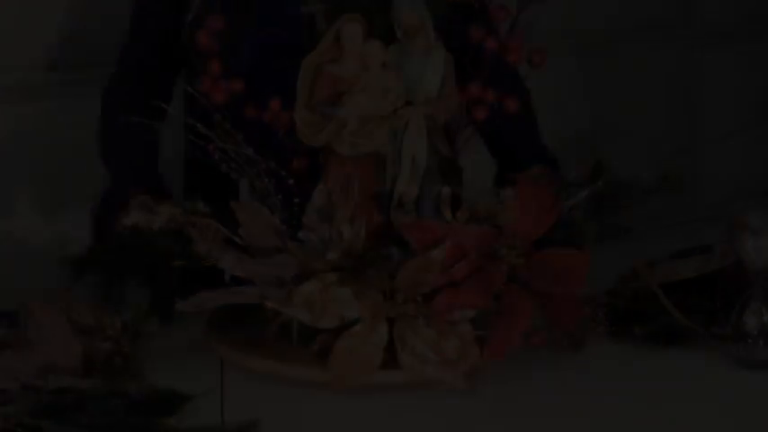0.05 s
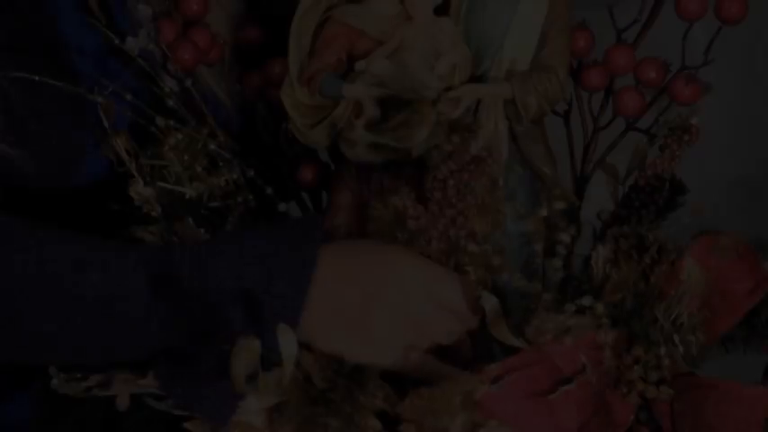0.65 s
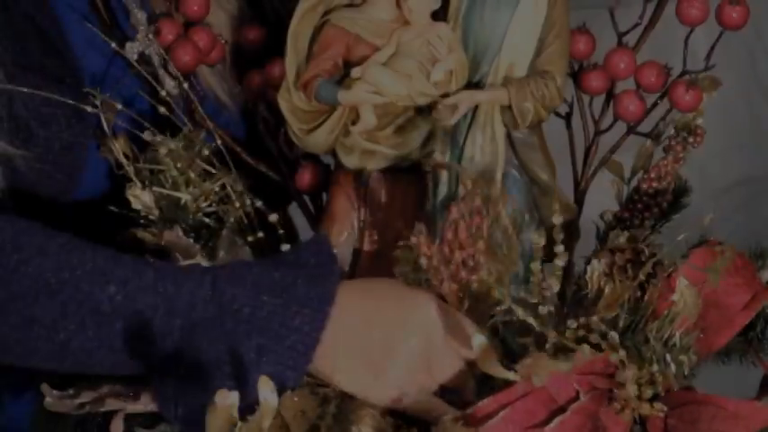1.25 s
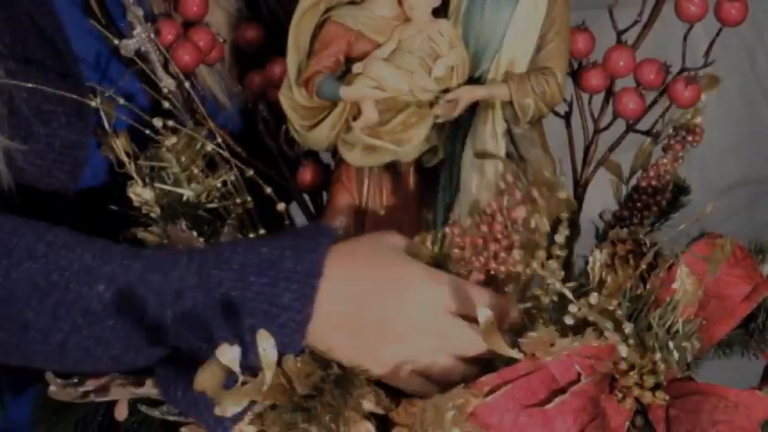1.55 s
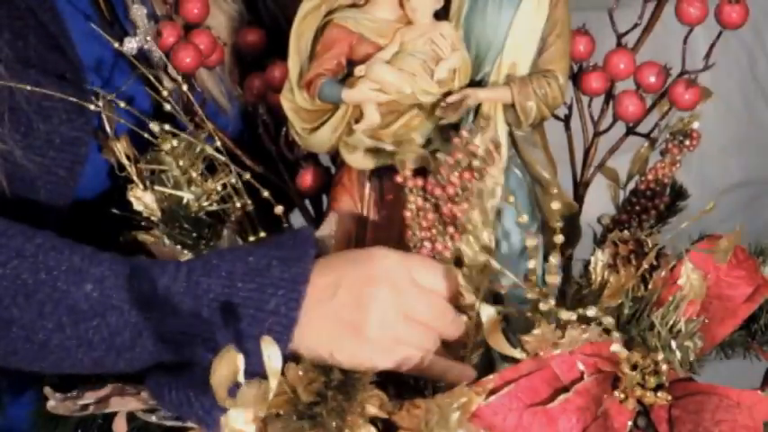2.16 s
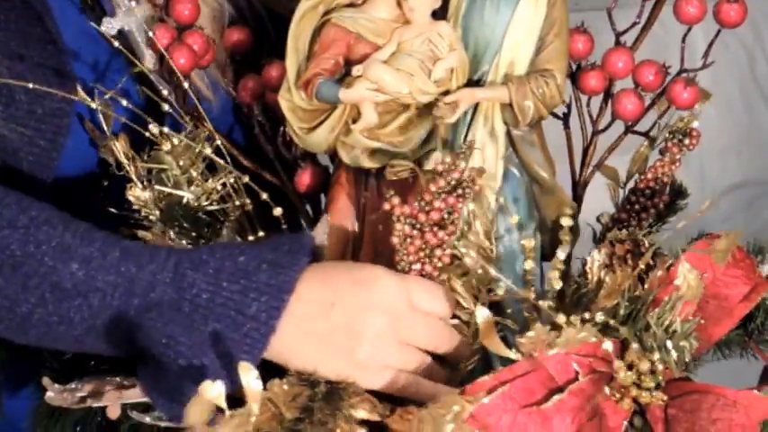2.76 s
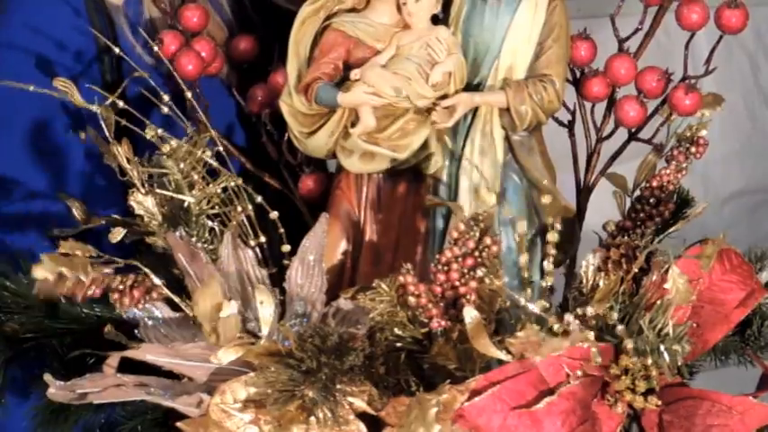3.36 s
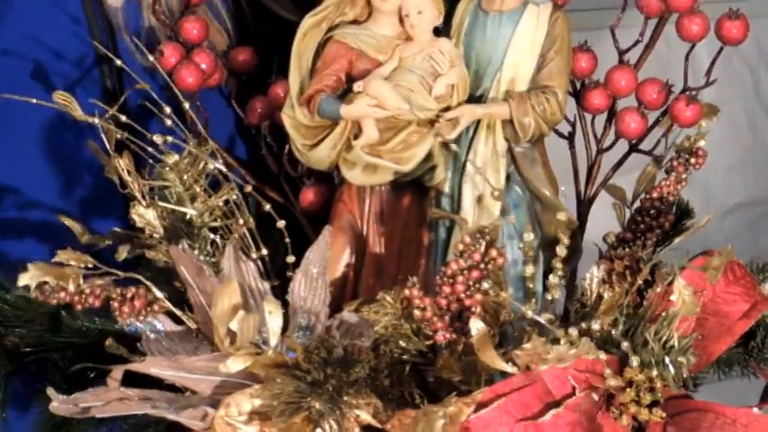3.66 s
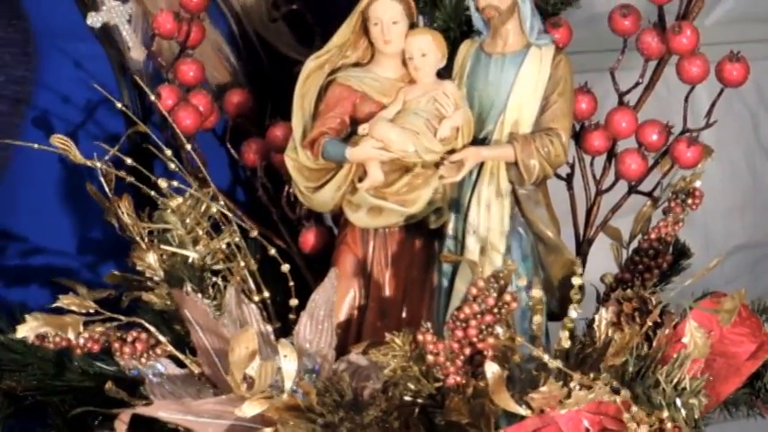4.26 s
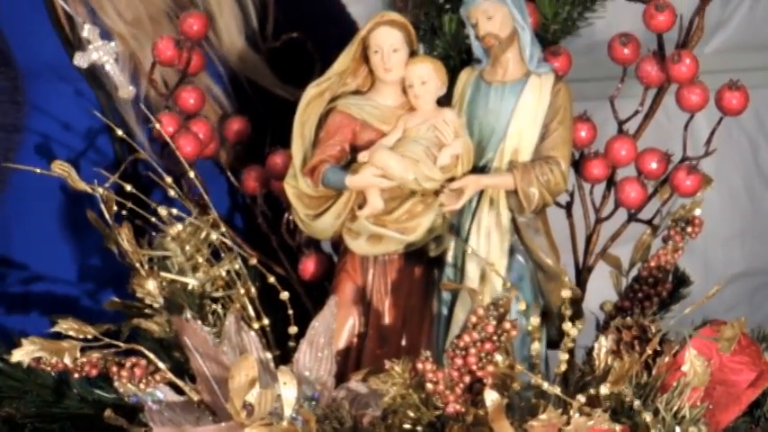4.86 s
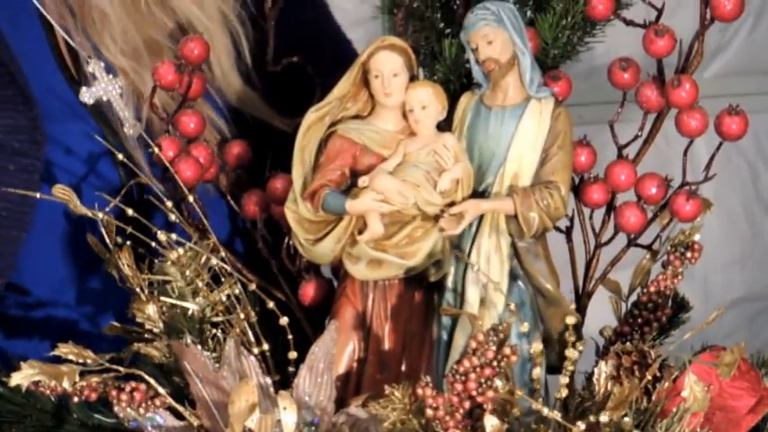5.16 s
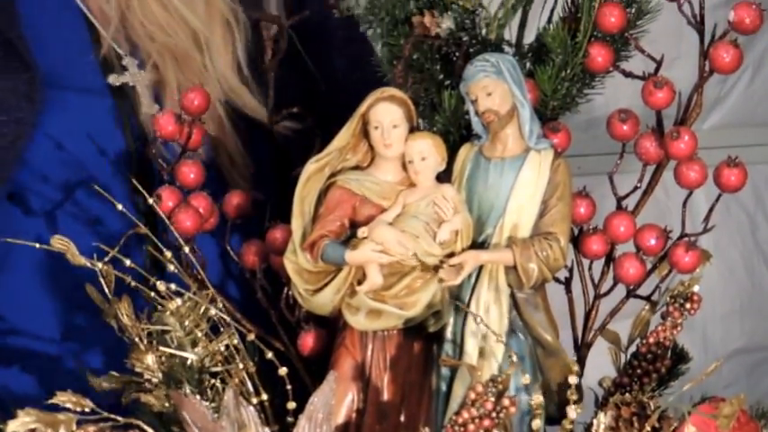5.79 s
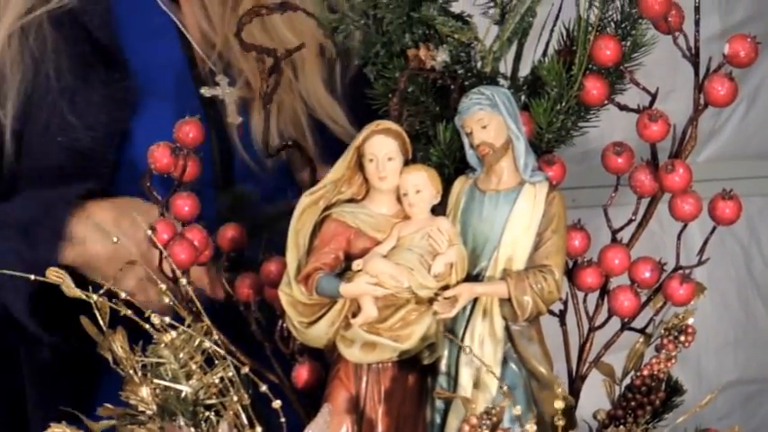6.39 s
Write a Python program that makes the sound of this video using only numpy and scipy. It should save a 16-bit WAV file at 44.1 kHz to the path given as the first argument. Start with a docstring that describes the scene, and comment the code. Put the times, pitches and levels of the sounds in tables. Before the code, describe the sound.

In a small, quiet room, a faint rustle fades out and the sound gradually returns. A plastic sprig is shoved into a foam block several times, crunching while stiff artificial leaves snap and click close to the microphone. The greenery then rustles in short, crisp strokes, and things drag and bump softly on the table, over a low rumble and hiss.

```python
"""A sprig of plastic berries and glittery stems is pushed into a floral arrangement in a small room.
Its stem crunches into the foam in a few shoves, each a swarm of tiny breaks. Stiff leaves brush past
each other and snap free, then things are dragged and bumped on the table behind it.
A near surface repeats every snap, and the room rings briefly over a low rumble and hiss.
The sound starts quiet, fades out, and is fully back after about two seconds."""
import sys
import numpy as np
from scipy import signal
from scipy.fft import rfft, irfft, next_fast_len
from scipy.io import wavfile
from scipy.ndimage import uniform_filter1d

SR = 44100
rng = np.random.default_rng(int(sys.argv[2]) if len(sys.argv) > 2 else 0)


def transcribe(signal):
    """Save signal, clipped to [-1, 1], as a 16-bit WAV file at the path in sys.argv[1]."""
    frames = np.atleast_2d(signal).T
    limited = np.clip(frames, -1, 1)
    pcm = np.round(limited * 32767).astype(np.int16)
    wavfile.write(sys.argv[1], SR, pcm)


N = 287973
T = np.arange(N) / SR
TOP_HZ = 14250  # higher pitches are cut from the finished sound


def undb(db):
    """Turn decibels into a number to multiply by."""
    return 10 ** (np.asarray(db) / 20)


def unit(x):
    """Scale a sound to an average power of 1."""
    return x / np.sqrt(np.mean(x ** 2))


def add(track, s, sound):
    """Mix a sound into the track, starting s seconds in."""
    i = max(int(s * SR), 0)
    track[i:i + len(sound)] += sound[:max(N - i, 0)]


def keep_band(x, kind, hz, order):
    """Keep the "low" or the "high" side of a pitch."""
    return signal.sosfilt(signal.butter(order, hz, kind, fs=SR, output="sos"), x)


def colour(x, points, modes=()):
    """Shape the tone with a curve of (pitch [Hz], relative level [dB]) points and any ringing notes."""
    size = 2 * next_fast_len(x.shape[-1])
    hz = np.arange(size // 2 + 1) * SR / size + 1e-3
    point_hz, point_db = np.transpose(points)
    curve = undb(np.interp(np.log(hz), np.log(point_hz), point_db))
    cepstrum = irfft(np.log(curve))
    response = np.exp(rfft(2 * cepstrum[:size // 2], size))  # rings after a hit, never before it
    response *= 1 + sum(undb(db) / (1 + 1j * (hz ** 2 - note ** 2) / (hz * width))
                        for note, width, db in modes)
    response /= np.sqrt(np.mean(np.abs(response[hz < TOP_HZ]) ** 2))
    return irfft(rfft(x, size) * response)[..., :x.shape[-1]]


def burst(hz, octaves, t60, size):
    """One small hit: a cluster of notes round one pitch that dies away by 60 dB in t60 seconds."""
    pitches = np.arange(1, size // 2 + 2) * SR / size
    weight = np.exp(-.5 * (np.log2(pitches / hz) / octaves) ** 2) / np.sqrt(pitches)
    ring = irfft(weight * np.exp(2j * np.pi * rng.random(len(pitches))))
    ring *= np.exp(-np.log(1000) * np.arange(size) / SR / t60)
    return ring / np.linalg.norm(ring)


def grains(per_s, spread_db, t60, octaves, count=24):
    """Many tiny breaks of uneven size, each ringing at one of a set of pitches."""
    chance = rng.random(N)
    sizes = undb(spread_db * np.minimum(rng.exponential(size=N), 3.5))
    hits = (chance < per_s / SR) * sizes * rng.choice([-1, 1], N)
    hits /= np.sqrt(uniform_filter1d(hits ** 2, SR // 25) + 1e-2)  # even out the loudness
    choice = rng.integers(count, size=N)
    return unit(sum(signal.oaconvolve(hits * (choice == k), burst(hz, octaves, t60, size=256))[:N]
                    for k, hz in enumerate(np.linspace(1800, 13500, count))))


def effort(moves, rise_s, fall_db_per_s):
    """Strength over time: each move swells up to its time, holds, then fades; the strongest leads."""
    strength = np.zeros(N)
    for s, held_s, db in moves:
        swell = np.clip(1 + (T - s) / rise_s, 0, 1)
        fall_db = fall_db_per_s * np.clip(T - s - held_s, 0, 1)
        strength = np.maximum(strength, swell * undb(db - fall_db))
    return strength


def scatter(delay_s, apart, size=512):
    """A path through the leaves: each pitch gets its own small delay; left and right part up high."""
    hz = np.arange(size // 2 + 1) * SR / size
    delay = delay_s * uniform_filter1d(rng.exponential(size=len(hz)), 2) + 8 / SR
    phase = np.cumsum(2 * np.pi * SR / size * delay)
    split = apart * hz / (hz + 1500) * 2 * uniform_filter1d(rng.standard_normal(len(hz)), size=4)
    return irfft(np.exp(-1j * (phase + np.array([split, -split]))))[:, :size // 2]


def room_response(tail_db, scatter_s, t60=0.51, echo_db=-3.5):
    """The room's answer to a click: direct sound, one near echo, and a tail whose highs die first."""
    t = T[:SR * 2 // 3]
    mid, side = rng.standard_normal((2, 2, len(t)))
    side = keep_band(side, "high", 700, order=1)
    pair = np.array([mid + side, mid - side])
    fall = -np.log(1000) * t / t60
    soft = keep_band(pair[:, 0], "low", 7000, order=2) * np.exp(fall)
    bright = keep_band(pair[:, 1], "high", 7000, order=2) * np.exp(1.43 * fall)
    tail = (soft + bright) * (1 - np.exp(-t / 0.00067))
    response = undb(tail_db) * tail / np.linalg.norm(tail, axis=1, keepdims=True)
    echo_s = .0053 + .00012 * rng.standard_normal()
    directs = scatter(scatter_s, apart=0.32)
    echoes = scatter(1.467 * scatter_s, apart=0.26)
    for channel, direct, echo in zip(response, directs, echoes):
        add(channel, 0, direct)
        add(channel, echo_s, undb(echo_db) * echo)
    return response / np.linalg.norm(response, axis=1, keepdims=True)


def room(x, tail_db, scatter_s, pan_db, wander_hz, count=4):
    """The paths to the two microphones change as the sounding spot wanders between a few places."""
    shares = np.maximum(np.cos(2 * np.pi * (wander_hz * T + np.arange(count)[:, None] / count)), 0)
    shares /= np.linalg.norm(shares, axis=0)
    heard = sum(signal.oaconvolve((x * share)[None], room_response(tail_db, scatter_s), axes=1)[:, :N]
                for share in shares)
    return heard * undb(np.array([[pan_db], [-pan_db]]) / 2)


# Tone of the quiet room: (pitch [Hz], relative level [dB])
BACKGROUND_TONE = [(11, -53), (18, 1), (55, -2), (96, -4), (130, -6.5), (326, -13), (396, -14.5),
                   (443, -14), (840, -16.5), (1020, -18.5), (2230, -23.5), (2710, -21.5), (3200, -24),
                   (5740, -25), (14000, -28.5)]


def background(whine_hz=2720, room_note_hz=204, level_db=-40):
    """The quiet room: a low rumble shared by both sides, a faint whine and a wide hiss."""
    notes = [(whine_hz, 130, -3.5), (room_note_hz, 14, -14.0)]
    mid = unit(colour(rng.standard_normal(N), BACKGROUND_TONE, notes))
    side = unit(colour(rng.standard_normal(N), BACKGROUND_TONE))
    side = undb(-11) * side + undb(-3) * keep_band(side, "high", 1500, order=1)
    return np.array([mid + side, mid - side]) * undb(level_db)


# Between shoves the hand stays on the sprig, stirring the leaves and grinding the stem a little.
GRIP_START_S, GRIP_HELD_S = 0.75, 1.9
# Tone of the rustle: (pitch [Hz], relative level [dB])
LEAF_TONE = [(710, -27), (1200, -10), (1290, -8), (2220, -9), (4380, -5.5), (6820, 0.5), (10100, -0.5),
             (11600, 1.5), (14000, 1.5)]
# Leaves and needles sweeping over each other: (time [s], hold [s], relative level [dB])
LEAF_STROKES = [(.01, 0.057, -29), (.13, 0.066, -39.5), (.60, 0.19, -42), (1.55, .28, -38),
                (2.06, 0.018, -39.5), (2.32, 0.19, -30.5), (2.58, 0.041, -44), (2.68, 0.14, -43.5),
                (2.835, 0.064, -36), (2.935, 0.092, -29), (3.03, 0.16, -28), (3.315, 0.0035, -36.5),
                (3.55, .004, -45), (4.035, 0.085, -42.5), (4.14, .12, -36.5), (4.355, .004, -47),
                (4.605, 0.049, -22), (4.69, 0.052, -30.5), (4.885, .004, -34), (4.96, .004, -34.5),
                (5.355, .03, -37), (5.415, 0.049, -32.5), (5.815, 0.081, -40), (6.3, .01, -52)]


def leaves(grip_db=-52):
    """Needles and glitter flick past each other in fine ticks; gives the sound and its strength."""
    moves = LEAF_STROKES + [(GRIP_START_S, GRIP_HELD_S, grip_db)]
    brush = effort(moves, rise_s=0.046, fall_db_per_s=233)
    ticks = grains(per_s=1500, spread_db=4, t60=0.0028, octaves=0.88) * brush
    rustle = colour(ticks, LEAF_TONE) * undb(1.12)
    return room(rustle, tail_db=5.0, scatter_s=0.000242, pan_db=0.3, wander_hz=17), brush


def small_snaps(handling, per_s=19, spread_db=2.5, count=400):
    """List lesser snaps that come by chance, about as strong as the handling is at that moment."""
    gaps = rng.gamma(2, .5, count) / per_s  # a leaf needs a moment to bend before it slips
    rows = []
    for s, (size, pitch) in zip(np.cumsum(gaps), rng.standard_normal((count, 2))):
        if s < T[-1]:
            handling_db = 20 * np.log10(handling[int(s * SR)] + 1e-9)
            rows.append((s, handling_db + .5 + spread_db * size, 8000 * 2 ** (.25 * pitch)))
    return rows


# Tone of stiff plastic: (pitch [Hz], relative level [dB])
PLASTIC_TONE = [(300, -60), (900, -13), (1500, -9), (2800, -3.5), (5000, -1.5), (8000, -0.5), (14000, 2)]
# The loudest snaps: (time [s], relative level [dB], pitch [Hz])
LOUD_SNAPS = [(0.0814, -20, 9900), (.734, -24, 9300), (.7953, -26, 9000), (.839, -11.5, 9100),
              (0.9027, -5, 7300), (.961, -14, 8550), (0.984, -4, 8200), (1.0148, -11, 7450),
              (1.0253, -10, 7600), (1.081, -9.5, 6600), (1.1752, -13, 6040), (1.2144, -20, 6500),
              (1.402, -19, 8550), (1.4116, -11.5, 8100), (1.4424, -9, 7060), (1.669, -17, 9800),
              (2.106, -20, 6800), (2.1198, -24, 6640), (2.137, -18, 6350), (2.1438, -18, 8000),
              (2.1833, -12, 6750), (2.1989, -9, 6000), (2.2248, -14, 7650), (2.2417, -19, 6800),
              (2.3361, -17, 8560), (2.6418, -15.5, 4800), (2.824, -27.5, 8500), (3.14, -21.5, 9050),
              (3.1894, -15.5, 12500), (4.013, -35.5, 6140), (4.628, -21, 10700), (4.8662, -20.5, 11500),
              (4.957, -28, 9500)]


def snaps(handling):
    """A stiff leaf or twig slips free with a sharp crack and a tiny ring; thin ones ring higher."""
    track = np.zeros(N)
    for s, db, hz in LOUD_SNAPS + small_snaps(handling):
        crack = burst(hz, octaves=1.16, t60=0.0027, size=512)
        ring = burst(hz, octaves=.55, t60=.009, size=512)
        release = 1 - np.exp(-T[:len(crack)] / 0.00019)  # the plastic takes a moment to let go
        snap = colour((crack + undb(-5.5) * ring) * release, PLASTIC_TONE)
        add(track, s - .0004, undb(db) * snap / np.linalg.norm(snap))
    return room(track * undb(23.5), tail_db=0.5, scatter_s=0.000285, pan_db=-1.0, wander_hz=7)


# Tone of crushed foam: (pitch [Hz], relative level [dB])
CRUNCH_TONE = [(150, -39), (300, -8.5), (440, -13), (600, -6), (1000, -2), (1250, -8), (1800, -7.5),
               (2500, -0.5), (5000, 4), (6300, 4.5), (8300, 6), (9700, 2.5), (14000, 4)]
# Ringing notes of the foam block and the stem in it: (pitch [Hz], width [Hz], boost [dB])
FOAM_NOTES = [(600, 46, 9.5), (715, 26, 9.5), (895, 50, 11), (979, 25, 14), (3060, 60, -0.5),
              (5020, 130, -2), (7840, 32, 5), (8600, 120, -4)]
# Shoves of the stem into the foam: (time [s], hold [s], relative level [dB])
STEM_SHOVES = [(.84, 0.013, -26.5), (.908, 0.0022, -23.5), (.995, 0.1, -18.5), (1.19, 0.1, -17.5),
               (1.452, 0.0018, -17.5), (2.118, 0.033, -17), (2.206, .006, -10.5), (2.225, 0.038, -19.5),
               (2.295, .048, -22.5)]


def stem(grip_db=-41.5):
    """Foam cells break in a crunch that rings block and stem; gives the sound and its strength."""
    moves = STEM_SHOVES + [(GRIP_START_S, GRIP_HELD_S, grip_db)]
    push = effort(moves, rise_s=0.015, fall_db_per_s=480)
    breaks = grains(per_s=900, spread_db=3.0, t60=0.0025, octaves=1.0) * push
    crunch = colour(breaks, CRUNCH_TONE, FOAM_NOTES) * undb(2.0)
    return room(crunch, tail_db=0.5, scatter_s=0.000206, pan_db=0.0, wander_hz=13), push


# Dull bumps on the table: (time [s], relative peak [dB], pitch [Hz], width [octaves], ring time [s])
TABLE_BUMPS = [(1.376, -35, 208, 0.48, 0.079), (2.425, -29.5, 269, 0.34, 0.14),
               (4.129, -32, 265, 0.22, .05), (4.354, -21, 1460, .35, 0.037),
               (4.365, -21.5, 596, 1.25, 0.045), (4.534, -21, 1380, 1.17, 0.021),
               (4.616, -18.5, 400, 0.69, 0.02), (4.650, -17.5, 370, 1.45, 0.054),
               (4.941, -20, 430, 0.6, 0.046), (5.805, -13.5, 470, 1.3, 0.048),
               (5.813, -21, 230, 1.47, 0.25)]


def bumps(hits=TABLE_BUMPS):
    """Each knock against the table sets off a cluster of notes that quickly dies away."""
    track = np.zeros(N)
    for s, db, hz, octaves, t60 in hits:
        thud = burst(hz, octaves, t60, size=8192)
        add(track, s, undb(db + 1.0) * thud / np.abs(thud).max())
    return track


# Tones of rubbing on the table and of its deep boom: (pitch [Hz], relative level [dB])
RUB_TONE = [(100, -21), (300, -0.5), (600, 4), (1000, 0), (1500, -3.5), (2600, -5), (5000, -10.5),
            (12000, -40)]
BOOM_TONE = [(60, -36), (130, -20), (200, 4.5), (300, 7.5), (650, 7), (1300, -44.5), (5000, -49)]
# Low ringing notes of the table top: (pitch [Hz], width [Hz], boost [dB])
TABLE_NOTES = [(207, 25, 14), (264, 62, 12), (294, 13, 19)]
# Sleeve and branches dragging: (time [s], hold [s], relative level [dB], boom over the rubbing [dB])
TABLE_DRAGS = [(2.97, .18, -38, -9.5), (4.101, .02, -32, -6), (4.132, 0.02, -27, -5),
               (4.2, 0.044, -32.5, -9), (4.28, 0.14, -38, -3), (4.645, 0.016, -31, 3.5),
               (4.74, 0.0085, -31.5, -12), (4.82, 0.079, -36.5, -2), (4.945, 0.024, -32, -2.5),
               (5.295, .004, -34, -20), (5.352, .01, -31.5, -34), (5.4, .06, -40.5, -12),
               (5.48, .01, -33.5, -8), (5.57, 0.14, -46.5, 1), (5.837, 0.0031, -28.5, 2),
               (5.9, 0.0082, -36, -5), (6.3, .006, -41.5, -9)]


def drags(slips_per_s=900, rise_s=0.046, fall_db_per_s=278):
    """Things stick and slip over the table in tiny jerks, and make it boom when pressed."""
    slips = (rng.random(N) < slips_per_s / SR) * rng.standard_normal(N)
    rubs = [(s, held_s, db) for s, held_s, db, _ in TABLE_DRAGS]
    presses = [(s, held_s, db + boom_db) for s, held_s, db, boom_db in TABLE_DRAGS]
    rub = effort(rubs, rise_s, fall_db_per_s) * unit(colour(slips, RUB_TONE))
    boom = effort(presses, rise_s, fall_db_per_s) * unit(colour(slips, BOOM_TONE, TABLE_NOTES))
    return (rub + boom) * undb(-4.0)


# Short creaks on the table: (time [s], relative peak [dB], pitch [Hz])
TABLE_CREAKS = [(5.574, -27.5, 595), (5.621, -33, 620), (5.647, -29, 605)]


def creaks(octaves=0.12, t60=.05):
    """Something catches and slips on the table: like a bump, but with a clearer pitch."""
    return bumps([(s, db, hz, octaves, t60) for s, db, hz in TABLE_CREAKS])


def scene():
    """All the handling over the quiet room; harder pushing and brushing make the small snaps louder."""
    crunch, push = stem()
    rustle, brush = leaves()
    table = room(drags() + bumps() + creaks(), tail_db=1.5, scatter_s=.0001, pan_db=-0.1, wander_hz=5)
    return crunch + rustle + table + background() + snaps(push + brush)


def record(dry, silent_at_s=.388, fade_s=1.57):
    """Two microphones differ in tone; peaks are rounded, the volume dips to zero, and the top is cut."""
    left = colour(dry[0], [(1000, 1.4), (2800, 0.66), (5500, -1.65), (9000, -1.0), (13000, 2.34)])
    right = colour(dry[1], [(1000, 1.77), (2800, 1.3), (5500, 1.1), (9000, 1.2), (13000, -1.0)])
    rounded = np.tanh(.7 * np.array([left, right])) / .7
    fader = np.minimum(np.abs(T - silent_at_s) / fade_s, 1) ** 1.087
    top_cut = signal.ellip(12, .1, 80, TOP_HZ, fs=SR, output="sos")
    return signal.sosfilt(top_cut, rounded * fader)


dry = scene()
out = record(dry)
transcribe(out)
```